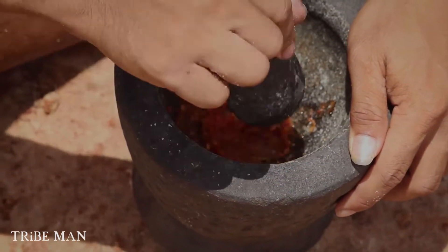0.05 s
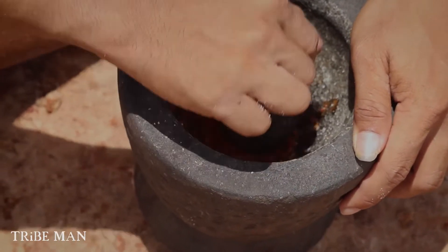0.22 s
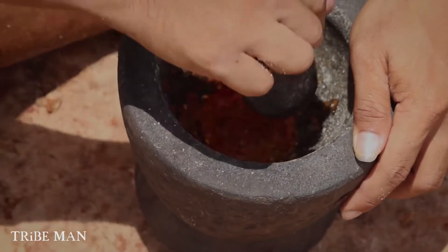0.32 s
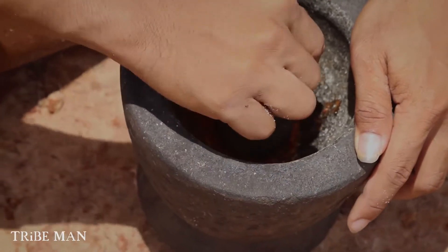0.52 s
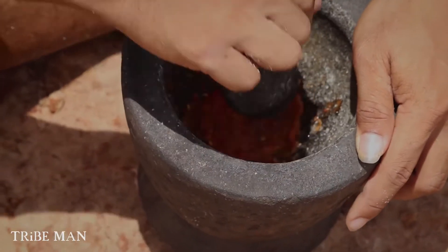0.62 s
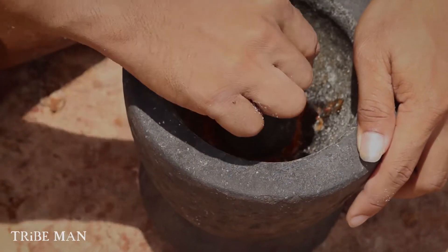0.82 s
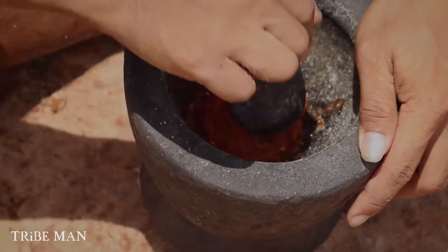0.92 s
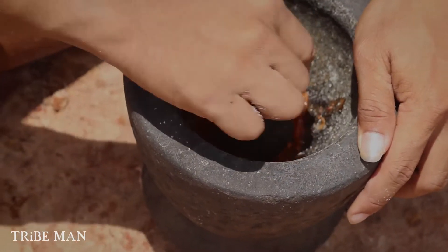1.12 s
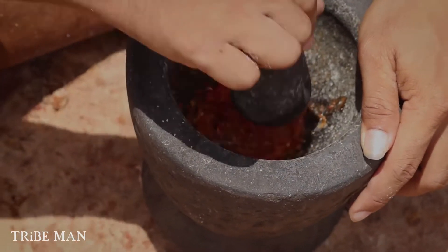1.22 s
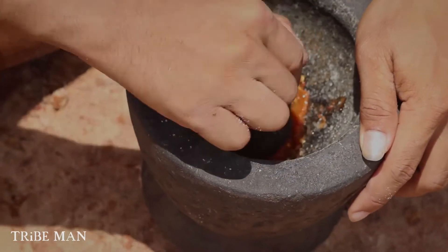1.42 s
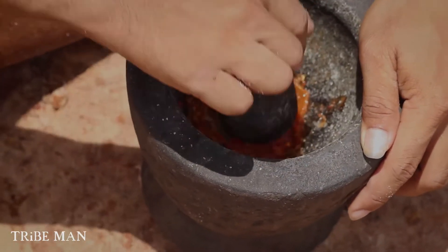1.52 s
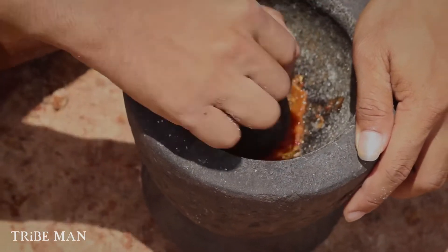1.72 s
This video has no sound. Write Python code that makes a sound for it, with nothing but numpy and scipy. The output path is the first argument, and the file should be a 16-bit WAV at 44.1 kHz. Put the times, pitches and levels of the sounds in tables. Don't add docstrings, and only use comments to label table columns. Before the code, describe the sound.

Five steady strokes of stone on stone through wet paste, the first hardest and overloaded, later ones duller with low ground thumps and sticky clicks. Very close, dry outdoor sound over faint hush, wind and insects.

```python
import sys
import numpy as np
from scipy import signal
from scipy.fft import rfft, irfft
from scipy.io import wavfile
from scipy.ndimage import uniform_filter1d

SR = 44100
rng = np.random.default_rng(int(sys.argv[2]) if len(sys.argv) > 2 else 0)


def nominal_scale(level):
    x = np.asarray(level, float) / 20
    return 10 ** x


def to_wav(s):
    ch = np.atleast_2d(s).T
    pcm = np.round(np.clip(ch, -1, 1) * 32767)
    wavfile.write(sys.argv[1], SR, pcm.astype(np.int16))


N = 77175


def evened(x):
    return x / np.sqrt(np.mean(x ** 2) + 1e-20)


def read(points, hz):
    f, value = np.transpose(points)
    return np.interp(np.log(hz + 1), np.log(f + 1), value)


def add(mix, s, sound):
    part = mix[..., round(s * SR):][..., :sound.shape[-1]]
    part += sound[..., :part.shape[-1]]


def left_right(value):
    return np.array([[value], [-value]])


def coloured(x, tone):
    gain = nominal_scale(read(tone, np.fft.rfftfreq(x.shape[-1], 1 / SR)))
    return irfft(rfft(x) * gain, x.shape[-1])


def resonate(x, hz, width):
    b, a = signal.iirpeak(hz, hz / width, SR)
    return evened(signal.lfilter(b, a, signal.lfilter(b, a, x)))


def crackle(per_s, spread_db, tone, wide):
    t = np.arange(200) / SR
    out = np.zeros((3, N))
    for hz in np.geomspace(900, 15000, num=16):
        size = rng.standard_normal((3, N))
        size *= nominal_scale(spread_db * np.minimum(rng.exponential(1, (3, N)), 4))
        bursts = size * (rng.random((3, N)) < per_s / SR / 16)
        cycles = t * hz
        grain = cycles * np.exp(-cycles / 0.69) * np.sin(2 * np.pi * cycles) * hz
        out += signal.oaconvolve(bursts, grain[None], axes=1)[:, :N]
    clump = nominal_scale(4.4 * evened(uniform_filter1d(rng.standard_normal(N), 60)))
    return evened(coloured((out[0] + wide * out[1:]) * clump, tone))


# (frequency [Hz], level per Hz [dB])
HUSH_TONE = [(76, -45), (130, -10), (295, -5), (333, -7.5), (440, -8), (1430, -14.5), (1720, -17.5),
             (8680, -26.5), (15500, -35)]
# (frequency [Hz], likeness [0-1])
HUSH_LIKENESS = [(60, .4), (300, 0.65), (1000, 0.21), (3000, 0.24), (15000, 0.11)]


def hush():
    level_db = -51.5
    frames, hz = N // 256 + 5, np.fft.rfftfreq(1024, 1 / SR)
    a, b, c, d, patches = rng.standard_normal((frames, 513, 5)).T
    patches = evened(uniform_filter1d(uniform_filter1d(patches, 10, 0), 12, 1))
    same = np.clip(read(HUSH_LIKENESS, hz), -1, 1)[:, None]
    left = a + 1j * b
    right = same * left + np.sqrt(1 - same ** 2) * (c + 1j * d)
    spectra = np.array([left, right]) * nominal_scale(read(HUSH_TONE, hz)[:, None] + 2.2 * patches)
    noise = signal.istft(spectra, nperseg=1024, noverlap=768)[1][:, :N]
    return nominal_scale(level_db) * evened(noise) * nominal_scale(left_right(1.))


# (start [s], length [s], level [dB])
INSECT_CHIRPS = [(0.12, 0.082, -68.5), (0.314, 0.088, -66), (0.566, 0.053, -64), (.748, 0.07, -69.5),
                 (0.94, 0.069, -68), (1.35, 0.081, -67.5), (1.55, .045, -66), (1.608, 0.019, -71.5),
                 (1.689, .07, -67)]


def insects():
    drone_hz, drone_width_hz, drone_db = 5180, 210, -66
    chirp_hz, chirp_width_hz, pulses_per_s = 8860, 220, 39
    t = np.arange(N) / SR
    drone = nominal_scale(drone_db) * resonate(rng.standard_normal((2, N)), drone_hz, drone_width_hz)
    on = sum(nominal_scale(db) * np.clip(np.minimum(t - s, s + length - t) / 0.011, 0, 1)
             for s, length, db in INSECT_CHIRPS)
    pulses = 1 + 0.41 * np.sin(2 * np.pi * pulses_per_s * t)
    chirp = on * pulses * resonate(rng.standard_normal(N), chirp_hz, chirp_width_hz)
    return drone + chirp * nominal_scale(left_right(1.5))


# (middle [s], level [dB], half length [s], left-right [dB])
WIND_GUSTS = [
    (0.29, -49.5, 0.03, 30),
    (0.41, -55.5, 0.049, -1),
    (0.533, -54, 0.013, -18.5),
    (0.11, -65, 0.02, -3),
    (0.638, -64, 0.03, -16),
    (1.115, -51, 0.017, 2.5),
    (1.472, -49, 0.01, -7),
]


def gusts():
    gust_hz, width_hz, breeze_db, port_own = 78.5, 49, -52.5, .95
    t = np.arange(N) / SR
    air = rng.standard_normal((3, N))
    air = air[0] + port_own * air[1:]
    b, a = signal.iirpeak(gust_hz, gust_hz / width_hz, SR)
    low = evened(signal.lfilter(b, a, signal.lfilter(*signal.butter(2, 220, fs=SR), air)))
    lumps = sum(nominal_scale(db + pan_db * left_right(.5)) * np.exp(-((t - s) / half) ** 2)
                for s, db, half, pan_db in WIND_GUSTS)
    return low * (nominal_scale(breeze_db + left_right(1.2)) + lumps)


# (frequency [Hz], level [dB])
YARD_ECHO_TONE = [(200, 0), (2000, 0), (5000, -10), (15000, -26)]


def yard(x):
    near_db, near_t60 = -25.5, 0.094
    wall_db, wall_s, wall_spread_s = -51.5, 0.17, 0.04
    t = np.arange(8000) / SR
    taps = rng.standard_normal((2, 2, 8000))
    near = taps[0] * nominal_scale(-60 * t / near_t60) * (t > .002)
    wall = taps[1] * np.exp(-((t - wall_s) / wall_spread_s) ** 2)
    tail = nominal_scale(near_db) * near / np.linalg.norm(near[0])
    tail = tail + nominal_scale(wall_db) * wall / np.linalg.norm(wall[0])
    return signal.fftconvolve(x[None], coloured(tail, YARD_ECHO_TONE), axes=1)[:, :N]


# (start [s], level [dB], start pitch [Hz], end pitch [Hz], length [s])
MORTAR_ROCKS = [
    (0.272, -51, 161, 53.6, 0.035),
    (.540, -38.5, 88, 74.2, 0.046),
    (.838, -40.5, 120, 76, 0.023),
    (0.862, -31.5, 110, 53, 0.018),
    (1.451, -38.5, 95, 64.6, 0.049),
]


def rocks():
    out = np.zeros((2, N))
    for s, level_db, start_hz, end_hz, length in MORTAR_ROCKS:
        u = np.arange(0, 1, 1 / (length * SR))
        turns = np.cumsum(start_hz * (end_hz / start_hz) ** u) / SR
        swell = np.sin(np.pi * u ** 0.45)
        thump = swell * np.sin(2 * np.pi * turns + left_right(.6))
        add(out, s, nominal_scale(level_db + left_right(2.)) * thump)
    return out


POP_TIMES = [.2290, .2670, .3050, .5280, .5330, .6214, .8385, .8395, .8497, .8993, .9258, 1.1530, 1.4465,
             1.4690, 1.5150, 1.5250, 1.5348, 1.5390]
# (peak [dB], pitch [Hz], ring [ms])
STICKY_POPS = [(-16, 1300, 0.22), (-60, 5700, 0.38), (-38.5, 10600, 0.16), (-29, 2800, 0.75),
               (-9.5, 9000, 0.15), (-30, 3800, 0.48), (-45, 3900, 0.27), (-14, 3560, 0.43),
               (-8, 5860, 0.44), (-30.5, 5300, 0.43), (-24.5, 2910, 1.13), (-9, 6500, 0.25),
               (-16.5, 3060, 0.96), (-45, 7000, .25), (-30.5, 8700, 0.26), (-24, 3150, 0.63),
               (-36, 1200, 0.28), (-24, 4300, 0.32)]


def pops():
    out = np.zeros((2, N))
    t = np.arange(600) / SR
    edge = 1 - np.exp(-t / 0.000076)
    for s, (peak_db, hz, ring_ms) in zip(POP_TIMES, STICKY_POPS):
        fizz = rng.standard_normal((3, 600)) * np.exp(-t / 0.00059)
        tone = np.exp(-1000 * t / ring_ms) * np.sin(2 * np.pi * hz * t)
        add(out, s, nominal_scale(peak_db) * edge * (tone + .5 * fizz[0] + 0.2 * fizz[1:]))
    return signal.lfilter(*signal.butter(2, [1800, 13000], "band", fs=SR), out)


# (middle [s], half length [s], level [dB], cavity pitch [Hz], cavity level [dB])
PESTLE_PEELS = [
    (0.296, 0.013, -47, 3367, -6),
    (0.627, 0.0098, -47, 2740, -5),
    (0.913, 0.017, -48, 3160, -9),
    (1.217, 0.014, -46.5, 3240, -34),
    (1.532, 0.0077, -38.5, 3180, -10.5),
]
GAP_WIDTHS = [90, 397, 320, 320, 320]
# (frequency [Hz], level [dB])
PEEL_COLOUR = [(800, -42), (1800, -3.5), (3100, -4.5), (5000, -7), (9000, -11.5), (15000, -28)]


def peels():
    t = np.arange(N) / SR
    fizz = crackle(10000, -0.5, PEEL_COLOUR, 0.77)
    out = np.zeros((2, N))
    for (s, half, db, hz, cavity_db), width in zip(PESTLE_PEELS, GAP_WIDTHS):
        swell = np.exp(-((t - s) / half) ** 2 * 0.5)
        out += nominal_scale(db) * swell * (fizz + nominal_scale(cavity_db) * resonate(fizz, hz, width))
    return out


# (start [s], length [s], level [dB], change by the end [dB], grinding into the bowl [dB])
PASTE_CRUSH = [
    (0.2086, 0.00155, -38.5, 21, -22),
    (.2090, 0.0025, -26, 7, -5),
    (0.21, 0.019, -28, 1, -7),
    (0.524, 0.014, -20.5, -2, 4.5),
    (0.836, 0.019, -18, -8.5, -23),
    (1.143, 0.021, -23.5, -9, -12),
    (1.4450, 0.0042, -21, -1.5, -15),
    (1.447, .021, -32.5, 2.5, 8),
]
# (frequency [Hz], level [dB])
CRUSH_COLOUR = [(400, -8), (900, -6), (1400, -12.5), (3200, -5.5), (4500, -9), (6500, -5), (10000, -6.5),
                (15000, -12.5)]


def crush():
    rise_s, settle_t60, settle_db = 0.0022, 0.013, -37
    dull_hz, dulling = 7000, .55
    t = np.arange(N) / SR
    bright_level, dull_level, grind_level = np.zeros((3, N))
    for s, length, level_db, change_db, grind_db in PASTE_CRUSH:
        u = t - s
        done = np.clip(u / length, 0, 1)
        after = np.maximum(u - length, 0)
        release = np.exp(-after / 0.00055) + nominal_scale(settle_db - 60 * after / settle_t60)
        stroke = nominal_scale(level_db + change_db * done) * np.clip(u / rise_s, 0, 1) * release
        bright_level += stroke * (1 - dulling * done)
        dull_level += stroke * dulling * done
        grind_level += stroke * nominal_scale(grind_db)
    fizz = crackle(40000, 1.8, CRUSH_COLOUR, 1.0)
    dull = signal.lfilter(*signal.butter(2, dull_hz, fs=SR), fizz)
    return bright_level * fizz + dull_level * dull, grind_level * fizz.mean(0)


# (frequency [Hz], level [dB], t60 [s])
BOWL_MODES = [(769, 0, .016), (943, -10.5, .0098), (514, 0, .0063), (1659, 0, .0029), (1818, 0, .0065),
              (2149, 0, .0072), (2765, 0, .0078), (3381, -11, .0213), (3384, -48, .25), (3750, -14, .005),
              (6240, -16, .012), (6790, -13, .0072)]
MODE_PANS = [1, -2.5, 0.5, -1, -2, -4, 0, -5.5, -2, -5, -3, 9.5]


def ring(hard_db, spot):
    build_s, damp_curve, side_lag = .00016, 2., .07
    t = np.arange(8000) / SR
    shares = [1, 1, *spot] + [-nominal_scale(hard_db)] * 5
    out = np.zeros((2, 8000))
    for (hz, db, t60), share, pan_db in zip(BOWL_MODES, shares, MODE_PANS):
        level = nominal_scale(db - 60 * (t / t60) ** damp_curve + pan_db * left_right(.5))
        out += share * level * np.sin(2 * np.pi * hz * t + side_lag * pan_db * left_right(1))
    return (1 - np.exp(-t / build_s)) * out


KNOCK_TIMES = [.20918, .52661, .5290, .5339, .83963, 1.1446, 1.14811, 1.44823]
# (force [dB], hardness in the top modes [dB], direction [sign])
STONE_KNOCKS = [
    (-4.5, 1, 1),
    (-34.5, 10, -1),
    (-29.5, -18, 1),
    (-26.5, -16, 1),
    (-14.5, -23, -1),
    (-24.5, 0, 1),
    (-7, -29, 1),
    (-8.5, -35, 1),
]
BLOW_SPOTS = [(-.45, -3.5, 4, .7, -1), (.3, .6, 3.6, -1.8, -2.5), (0, .6, 0, 0, 0), (0, 0, 0, .3, .3),
              (.3, .5, .06, .05, -.04), (0, 2.5, 0, 1.5, 0), (-.56, -.45, .32, -.28, -.08),
              (-.7, .5, -.56, -.4, .03)]
GRINDING_SPOT = (.2, 1.5, .8, 1.2, 1.2)


def knocks(grind):
    grind_db, low_cut_hz = -18.5, 200
    grind_ring = evened(ring(0, GRINDING_SPOT)) / 90
    out = nominal_scale(grind_db) * signal.oaconvolve(grind[None], grind_ring, axes=1)[:, :N]
    for s, (force_db, hard_db, direction), spot in zip(KNOCK_TIMES, STONE_KNOCKS, BLOW_SPOTS):
        add(out, s, np.sign(direction) * nominal_scale(force_db) * ring(hard_db, spot))
    return signal.filtfilt(*signal.butter(2, low_cut_hz, "high", fs=SR), out)


def scene():
    paste, grind = crush()
    pounding = knocks(grind) + paste
    echo = yard(pounding.mean(0))
    release = peels() + pops()
    background = hush() + gusts() + insects()
    return pounding + echo + release + background + rocks()


def low_pass(x):
    return signal.sosfilt(signal.butter(12, 16640, fs=SR, output="sos"), x)


def record(dry):
    ceiling, edge_hz = .97, 16500
    clipped = np.clip(dry, -ceiling, ceiling)
    limited = signal.oaconvolve(clipped, signal.firwin(255, edge_hz, fs=SR)[None], "same")
    return low_pass(limited)


dry = scene()
out = record(dry)
to_wav(out)
```